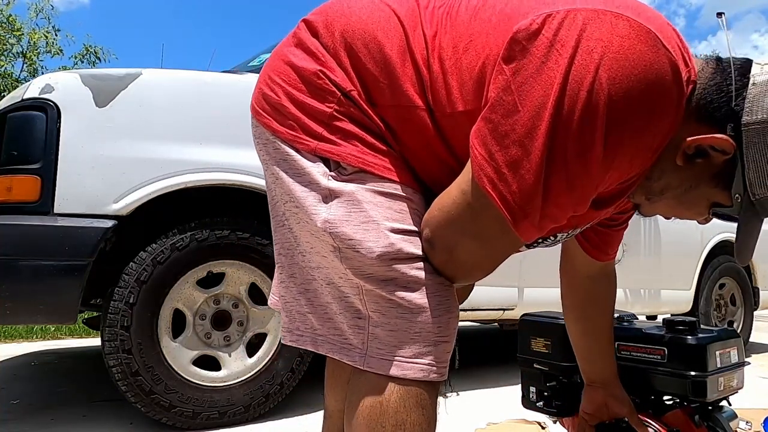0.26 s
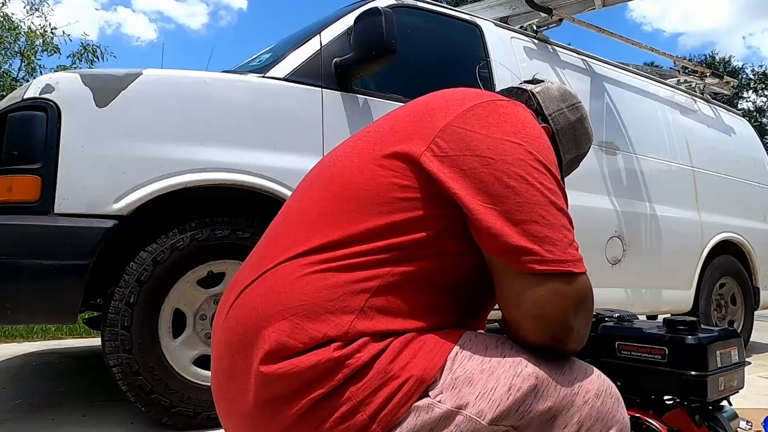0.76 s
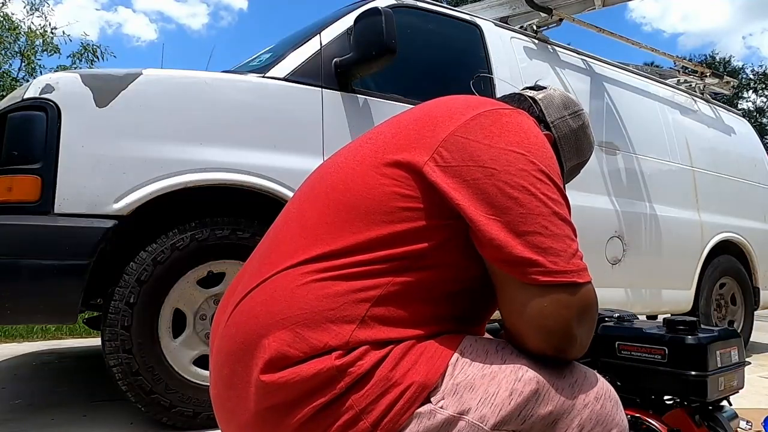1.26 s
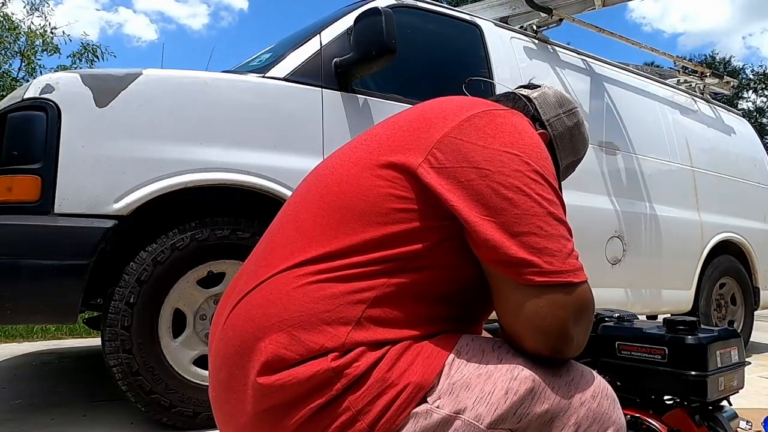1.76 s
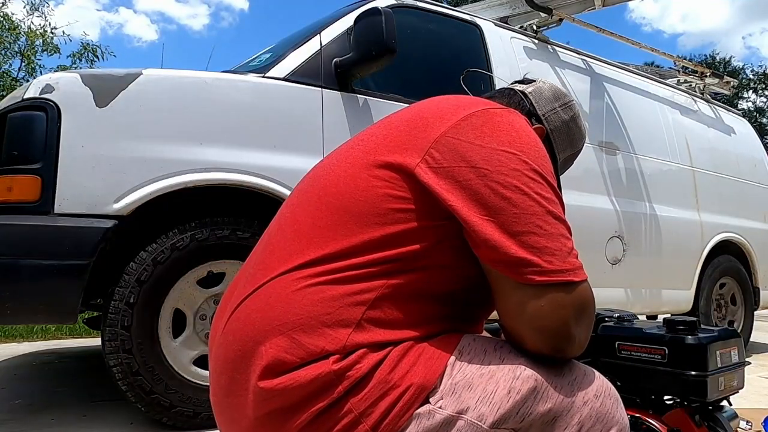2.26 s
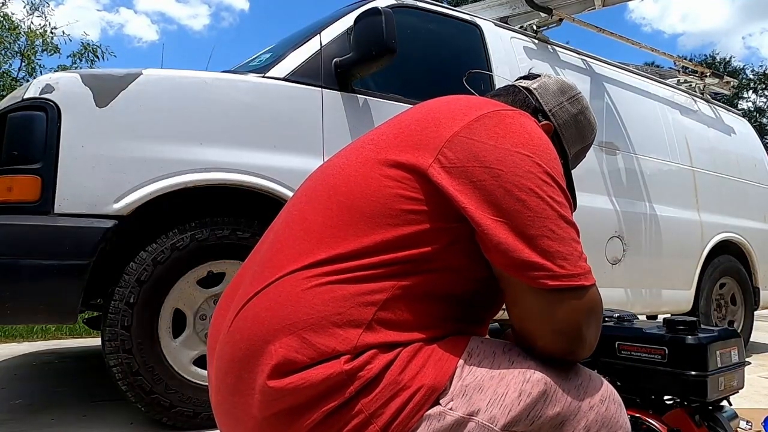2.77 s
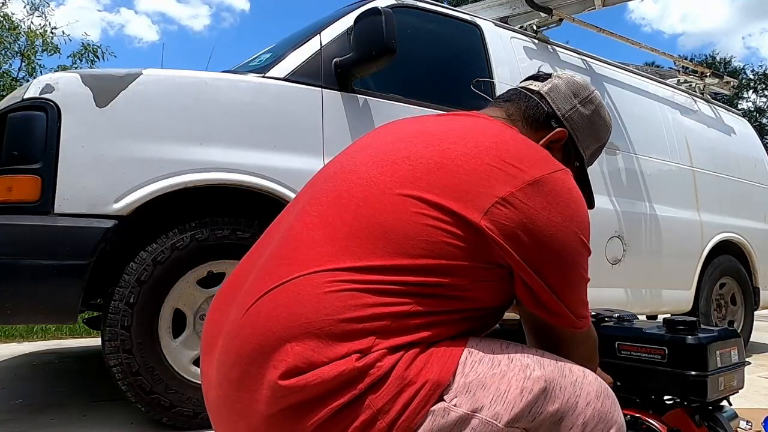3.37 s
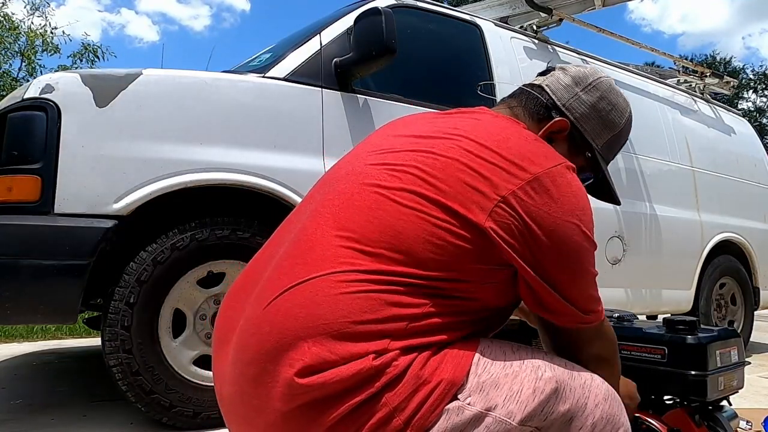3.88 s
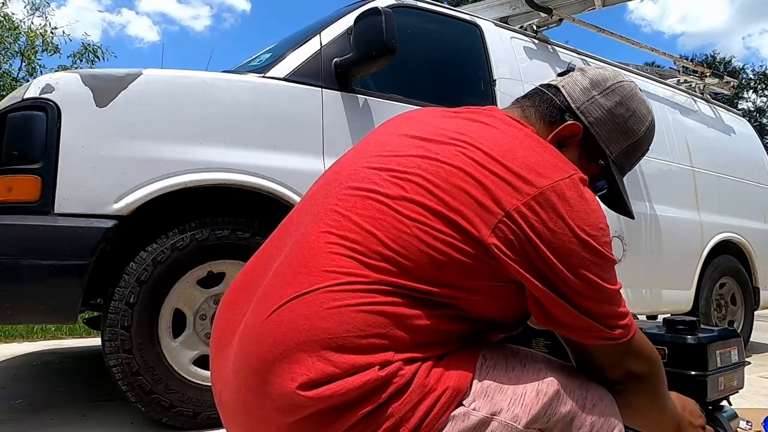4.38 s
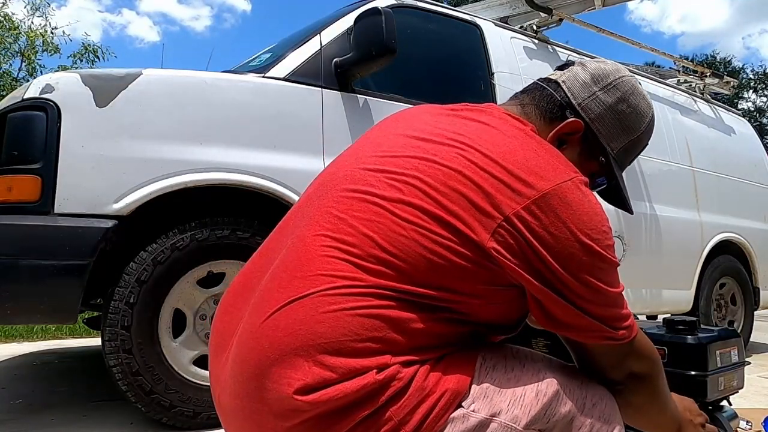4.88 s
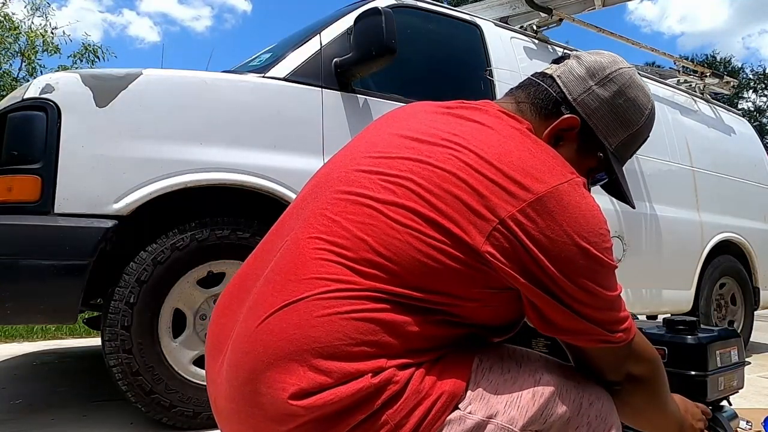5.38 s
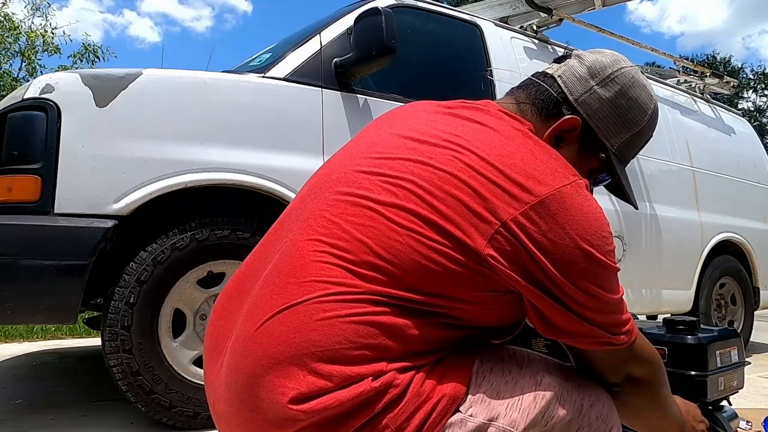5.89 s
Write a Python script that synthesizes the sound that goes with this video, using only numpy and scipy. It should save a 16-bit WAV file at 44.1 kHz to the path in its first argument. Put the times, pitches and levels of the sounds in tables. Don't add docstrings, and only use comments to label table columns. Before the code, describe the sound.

Outdoors in a driveway, a low road rumble and fan hum run throughout with faint leaves and hiss. A struck steel part rings down, then cuts away abruptly. Birds chirp and whistle. Close to the microphone, a hard metal knock is followed by a soft cloth brush, a louder rattling knock, then five spaced ratchet lever clicks with short metallic rings and slight yard reflections.

```python
import sys
import numpy as np
from scipy import signal
from scipy.fft import rfft, irfft
from scipy.io import wavfile
from scipy.ndimage import uniform_filter1d

SR = 44100
rng = np.random.default_rng(int(sys.argv[2]) if len(sys.argv) > 2 else 0)


def magnitude_from_level(level_db):
    exponent = np.asarray(level_db, float) / 20
    return 10 ** exponent


def int16_out(signal):
    q = np.round(np.clip(np.atleast_2d(signal).T, -1, 1) * 32767)
    wavfile.write(sys.argv[1], SR, q.astype(np.int16))


N = 270774

# time_s, level_db
TRAFFIC = [(0.3, -41), (1.0, -41), (1.45, -41.5), (2.1, -43.5), (2.25, -46), (2.4, -43), (2.9, -45),
           (3.2, -41.5), (3.5, -44.5), (4.1, -41.5), (4.35, -46), (4.55, -43), (6.1, -44)]
# pitch_hz, density_db
RUMBLE = [(8.8, -57), (15, -3.5), (64, 3), (146, -1), (177, -4), (206, -5.5), (241, -9), (258, -32),
          (291, -20), (382, -21.5), (900, -47), (1170, -63), (1980, -120)]
# pitch_hz, density_db
RUSTLE = [(290, -29), (500, -10.5), (742, -10), (805, -11), (1010, -10), (1050, -4.5), (1440, -6),
          (2080, -15), (2160, -15.5), (2780, -17), (5520, -17), (6060, -16), (8000, -24.5), (10400, -68),
          (17600, -120)]
# time_s, treble_lift_db
BREEZE = [
    (0, -6),
    (1.1, -3),
    (1.6, 0),
    (3.9, 1),
    (4.25, 7),
    (4.6, 2.5),
    (6.14, 7.5),
]
# pitch_hz, density_db
HISS = [(4410, -40), (7500, -12), (8650, -13.5), (10200, 0.5), (10600, 3), (11400, -17), (11700, -22),
        (11900, -41), (12700, -20), (13300, -13), (14000, -23), (14600, -38), (15500, -40)]
# pitch_hz, likeness (-1 to 1)
SIDE_LIKENESS = [(60, 0.97), (130, 1), (290, 0.87), (640, 0.65), (1410, 0.81), (3100, 0.37), (6820, 0.98),
                 (15000, -1)]
# pitch_hz, left_over_right_db
AIR_LEAN = [(60, 0), (290, -1), (640, -2), (1410, 0.5), (3100, 3.5), (6820, -2.5), (10000, 8), (15000, 17)]
# pitch_hz, width_hz, level_db
FAN_ORDERS = [(57.4, 6.5, -49.5), (117.86, 9.1, -50.5), (287, 24.5, -62.5), (346.7, 14, -69),
              (414, 3.8, -71.5)]
# pitch_hz, width_hz, level_db
HIGH_WHINES = [(10560, 150, -76), (13400, 120, -87.5)]
# pitch_hz, width_hz, level_db
RIDGES = [(991, 40, 0), (2050, 17, -9), (3720, 220, -6), (4740, 330, -12), (4950, 43, -10), (5210, 56, -12),
          (5930, 150, -9), (6930, 100, -12), (7330, 180, -16), (8660, 55, -25)]
THIRD_HZ, THIRD_DB = 178.1, -49.5
FOURTH_HZ, FOURTH_DB = 232.6, -56
TWIN_DB, TWIN_OFF_S, TWIN_FADE_S = -53, 3.78, 0.35
SLIP_START_S, SLIP_END_S, SLIP_HZ = 1.447, 2.684, 3.098

CUT_S = 0.69
# pitch_hz, level_db, t60_s, waver_width_hz
FIRST_TONES = [(610, -55, 1.7, 61), (563, -45.5, 0.97, 41), (1227, -56.5, 0.97, 21), (1396, -60, 0.71, 30),
               (856, -62, 0.75, 33), (1817, -54.5, 0.44, 40), (1780, -60.5, 3.6, 110),
               (950, -54.5, 1.1, 440)]
# level_db, t60_s
STEEL = [(-54, 1.1), (-46, 1.5), (-51.5, 1.5), (-56, 1.9), (-58.5, 2.2), (-52, 1.8), (-62, 1.4)]
STEEL_HZ = [622, 615, 609.5, 602.5, 597, 587, 555.5]
STEEL_IN_STEP_S = .025
# time_s, level_db
MOTOR = [
    (0, -41.5),
    (.3, -35),
    (.68, -44),
]
MOTOR_HZ = 79
# pitch_hz, level_db
THIN_WHINES = [(10627, -70), (13345, -82)]

# start_s, length_s, end_pitch_hz, level_db
CHIRPS = [(0.718, 0.057, 2020, -54.5), (1.061, 0.052, 1900, -58), (1.03, .04, 3150, -69),
          (1.06, .1, 3500, -70), (1.12, .09, 1780, -66), (1.298, .031, 2450, -65),
          (1.505, 0.026, 2620, -63), (2.713, 0.016, 2470, -56)]
# start_s, length_s, end_pitch_hz, level_db
FALLS = [(1.902, 0.05, 2140, -54.5), (1.964, 0.015, 2400, -61), (2.038, 0.012, 2040, -59),
         (2.246, 0.041, 2120, -54), (2.395, 0.022, 2080, -57.5), (2.612, 0.042, 2190, -52.5),
         (2.77, 0.02, 2076, -55.5), (5.045, .018, 2110, -58), (5.08, 0.031, 2110, -57.5),
         (5.327, 0.029, 1940, -62), (5.582, .021, 1970, -61)]
LIFTS = [1.869, 2.22, 4.69]
# start_s, length_s, end_pitch_hz, level_db
HELD = [
    (5.221, 0.042, 2450, -63),
    (5.479, 0.06, 2450, -60),
]
# start_s, length_s, start_pitch_hz, level_db
DROPS = [
    (3.073, 0.036, 3080, -56),
    (3.194, 0.04, 3020, -58.5),
    (3.323, 0.038, 2960, -60),
    (3.542, 0.041, 2950, -60),
    (3.972, 0.05, 3100, -61),
    (4.34, 0.04, 2680, -60.5),
]
# start_s, end_pitch_hz
GRACES = [(3.288, 3140), (3.504, 3300), (3.952, 3300), (4.299, 3050)]
COO_S, COO_LENGTH_S, COO_HZ, COO_DB = .775, .12, 1830, -61.5
LIFT_LENGTH_S, LIFT_HZ, LIFT_DB = 0.033, 2760, -64.5
GRACE_LENGTH_S, GRACE_DB = 0.023, -65.5
FALL_RATIO, HELD_RATIO, LIFT_RATIO, CHIRP_RATIO, DROP_RATIO = 1.25, 1.06, .92, 1.15, 1.3
NEAR_ROUGH, COO_ROUGH, DROP_ROUGH, FAR_ROUGH = 0.15, .55, .62, .8
GLIDE_BEND, DROP_BEND = 1.83, .42

# start_s, peak_db, chatter_t60_s, crack_over_modes_db, first_touch_over_chatter_db
KNOCKS = [
    (2.5996, -21.5, 0.053, 8.5, 10),
    (2.729, -39.5, 0.11, -2, -4),
    (3.7156, -20, 0.12, 0.5, -14),
    (3.744, -28, 0.18, 10, 1),
    (3.761, -27, 0.2, 4, -12),
    (4.721, -24.5, 0.077, -1, -13),
    (5.006, -36.5, 0.11, -1, -6),
    (5.279, -30, 0.097, 3.5, -6),
    (5.6229, -18.5, 0.065, 6.5, -12),
    (5.994, -25, 0.09, -0.5, -3),
]
# time_s, level_over_chatter_start_db
BOUNCES = [(2.6028, -15), (2.612, -10), (2.619, -12), (2.7363, 2), (3.7176, -3), (3.7204, 1), (3.723, 0),
           (3.7295, -7), (3.736, -5), (3.74, -8), (3.75, 4), (3.753, -2), (3.7588, -7), (3.767, 1),
           (3.77, 2), (3.778, -3), (3.7852, -3), (3.791, -9), (4.7239, 2.5), (4.7262, 3), (4.7286, -3),
           (4.7319, 2), (4.7388, -9), (4.7508, -12), (5.011, 8), (5.0162, -2), (5.022, -2), (5.2822, -6),
           (5.288, -7), (5.2968, -14), (5.625, 4.5), (5.6273, -4), (5.6306, 0), (5.635, -6), (5.64, -8),
           (5.644, -9), (5.648, -9), (5.656, -14), (5.664, -16), (5.9963, 3), (6.0005, -2), (6.0033, -6),
           (6.0094, -7), (6.024, -10)]
# pitch_hz, width_hz, level_db
BODIES = [
    [(1000, 140, -3), (1500, 49, 6), (1950, 66, -9), (2730, 87, -12), (4380, 200, 4), (5600, 94, -5),
     (5760, 80, -7), (6800, 90, -28), (7500, 92, -20)],
    [(1424, 38, 2), (2600, 400, -11), (4000, 42, -19), (4400, 200, -11), (6070, 71, -10), (6960, 44, -10)],
    [(1370, 90, -2), (1867, 60, 2.5), (2670, 230, -6), (3920, 160, -9), (5310, 50, -8), (6130, 42, -17),
     (6380, 32, -30), (7600, 120, -5), (8970, 100, -3), (9880, 30, -34)],
    [(1790, 87, -11), (1990, 53, 13), (2800, 240, -2), (5100, 110, -12), (6150, 110, -18), (7340, 84, 0),
     (8900, 100, -8)],
    [(1377, 43, 4.5), (2700, 200, -11), (4370, 33, -12), (5960, 35, -17), (7150, 60, -8), (8240, 67, -12),
     (8900, 51, -20)],
]
# pitch_hz, width_hz, level_db
LEVER_BODIES = [
    [(830, 100, -4.5), (1410, 31, -2), (1730, 38, -9), (2680, 110, -8), (3100, 55, -6), (3740, 72, -4),
     (5900, 42, -16), (7070, 46, -10), (7600, 32, -11)],
    [(1730, 84, -13), (3160, 40, 4), (3700, 57, 11), (5200, 25, -7), (5460, 58, -13)],
    [(850, 93, 2.5), (1270, 26, 4), (1720, 64, -14), (3140, 100, -3), (4030, 37, -12), (7730, 34, -5),
     (8700, 190, -21), (9100, 34, -17)],
    [(750, 41, 1), (1070, 25, -17), (1430, 99, -2), (1480, 15, -13), (1810, 69, 1.5), (2620, 20, 3.5),
     (3020, 110, -6), (3740, 66, 0), (6300, 41, -10)],
    [(732, 25, 2), (1273, 76, -8), (3100, 36, -9), (3390, 92, -5), (3700, 48, -3), (5600, 58, -13),
     (6360, 150, -14), (7300, 32, -13), (8800, 39, -13)],
]
# pitch_hz, density_db
CRACKS = [
    [(290, -56), (500, -59), (771, -5.5), (1480, -6), (2450, -7), (2790, -5), (3040, -18), (5040, -11.5),
     (5490, -3.5), (15800, -40)],
    [(530, -51), (900, -16), (1450, -7), (3610, -23), (4320, -12), (10900, -45), (15800, -56)],
    [(290, -61), (500, -40), (900, -14), (1830, 1), (2150, -11), (2710, -9), (5820, -16.5), (9100, -17),
     (12000, -34), (15800, -45)],
    [(290, -51), (500, -18), (1830, -3), (2240, -10), (4110, -14), (7330, -9), (15800, -39)],
    [(210, -43), (350, -13.5), (1380, -3), (2330, -14), (7330, -19), (13200, -33), (15800, -50)],
]
# pitch_hz, density_db
LEVER_CRACKS = [
    [(240, -42), (400, -10), (1750, -5), (2170, -17), (3710, -4), (4270, -13), (9930, -11), (12000, -35),
     (15800, -50)],
    [(350, -48), (600, -14), (1720, -12), (2290, -17), (3650, -14), (9760, -12), (15800, -50)],
    [(240, -39), (400, -19), (1570, -11), (1720, -4), (2380, -16), (3230, -11.5), (9780, -16), (15800, -53)],
    [(240, -52), (400, -58), (751, -7), (1830, -9), (2820, -32), (3660, -17), (9480, -22), (15800, -49)],
    [(240, -43), (400, -13), (587, -36), (751, -5), (1950, -7), (3440, -30), (4400, -22.5), (9780, -16),
     (15800, -65)],
]
# pitch_hz, level_db
TREBLE = [(3500, -40), (5500, 0)]
# start_s, pitch_hz, level_db, t60_s, cluster_width_hz
RINGS = [
    (2.6, 1500, -54, 0.6, 81),
    (2.6, 1118, -47.5, 0.45, 750),
    (3.72, 2890, -60, 0.5, 140),
    (3.772, 261.6, -34, 0.071, 3.1),
    (3.772, 190.2, -34.5, 0.18, 11),
    (4.724, 885, -44.5, 0.23, 180),
    (5.624, 830, -42.5, 0.21, 200),
    (5.01, 1730, -44.5, 0.059, 100),
]
# start_s, lower_hz, lower_db, upper_hz, upper_db
LEVER = [
    (4.724, 3180, -42, 3740, -42),
    (5.01, 3150, -52.5, 3640, -53),
    (5.283, 3330, -48, 3700, -60),
    (5.625, 3290, -49, 3637, -39.5),
    (5.997, 3406, -40, 3580, -53),
]
# lower_t60_s, upper_t60_s
LEVER_T60 = [(0.18, .14), (0.19, 0.17), (0.17, 0.14), (0.16, 0.15), (.2, .16)]
# start_s, pitch_hz, level_db, t60_s
PINGS = [(2.6, 1470, -38.5, .1), (2.6, 1970, -39.5, 0.066), (2.6, 2630, -43, .06), (2.6, 4290, -40, 0.035),
         (2.6, 4850, -44, 0.045), (2.6, 5510, -46, .06), (2.606, 1047, -41, 0.089),
         (3.718, 1780, -33, 0.11), (3.718, 1343, -35, .05), (3.722, 2700, -37, .08), (3.72, 7547, -45, .06),
         (3.718, 8900, -43, .08), (3.745, 7250, -46, .12), (3.745, 1810, -43, .12), (3.762, 1370, -36, 0.1),
         (3.775, 196, -32, .08), (4.722, 1430, -41, .08), (4.7225, 3740, -37, .1), (4.727, 3140, -45, 0.14),
         (4.73, 850, -35, .04), (4.728, 1730, -46, .1), (5.624, 1746, -34, 0.036),
         (5.624, 1886, -29, 0.048), (5.625, 1290, -33, .045), (5.626, 1047, -32, .04),
         (5.627, 765, -32.5, 0.08), (5.634, 3690, -43, 0.13), (5.625, 2605, -38, 0.058),
         (5.625, 6300, -45, .04),
         (5.0065, 1744, -48, .05), (5.011, 3133, -48, .07), (5.2795, 1760, -42, .05),
              (5.281, 1265, -43, .05), (5.283, 899, -41, .066), (5.282, 3219, -43, .03),
              (5.9942, 1450, -30, .025), (5.9942, 1750, -33, .025), (5.6245, 1500, -28, .04),
              (2.6, 2250, -40, .07), (3.7195, 1900, -33, .07), (5.9955, 1270, -40, .07),
              (5.997, 732, -37, .07), (6.002, 3112, -43, .055), (5.997, 3731, -43, .07),
              (6.004, 3402, -46, .1), (4.7213, 1350, -38, .025), (4.76, 950, -48, .08),
              (5.644, 900, -42, .06), (5.654, 1850, -47, .05), (3.724, 2950, -40, .06),
              (3.726, 2050, -38, .08), (3.765, 1750, -42, .06), (3.774, 8200, -54, .03)]
# pitch_hz, left_lift_db
HANDS_LEAN = [(130, 8.5), (640, -1.5), (1410, 1.5), (3100, 1.5), (5000, 0.5), (6820, -5), (10000, 1.5),
              (15000, -2)]
# pitch_hz, density_db
CLOTH = [(900, -12), (2000, -12), (3800, -1.5), (7000, -8), (11000, -21), (15000, -35)]
HANDS_PAN_DB = -2.5
TOUCH_RISE_S, BOUNCE_T60_S, PING_RISE_S = 0.0011, 0.0088, .001
TREBLE_FLASH_DB, TREBLE_T60_S, TREBLE_LOSS = -5, 0.04, 0.3
RING_CLEAR = .4
PAIR_WIDTH_HZ = 150
FRAME_HZ, FRAME_DB, FRAME_T60_S, FRAME_WIDTH_HZ = 456.2, -12.5, 0.28, 14
BRUSH_S, BRUSH_LENGTH_S, BRUSH_DB, BRUSH_EDGE_DB = 2.95, 0.24, -54.5, -14.5

# pitch_hz, phase_rad
PORT_LAG = [(100, 0.013), (1000, -0.39), (2800, -0.81), (4500, -1.19), (7600, -1.42), (12000, -1.76)]


def evened(x):
    return x / np.sqrt(np.mean(x ** 2) + 1e-20)


def read(points, hz):
    f, value = np.transpose(points)
    return np.interp(np.log(hz + 1), np.log(f + 1), value)


def add(mix, s, sound, pan_db):
    part = mix[:, round(s * SR):][:, :len(sound)]
    part += magnitude_from_level([[pan_db / 2], [-pan_db / 2]]) * sound[:part.shape[1]]


def coloured(x, points):
    gain = magnitude_from_level(read(points, np.fft.rfftfreq(len(x), 1 / SR)))
    return irfft(rfft(x) * gain, len(x))


def resonate(x, hz, width):
    turn = np.exp(2j * np.pi * np.cumsum(hz * np.ones(len(x))) / SR)
    r = np.exp(-np.pi * width / SR)
    return 2 * (turn * signal.lfilter([1 - r], [1, -r], x / turn)).real


def fuzzy(hz, width, count):
    once = resonate(rng.standard_normal(count + 8192), hz, width)
    return evened(resonate(once, hz, 2 * width)[8192:])


def tone(curve, hz, drift_hz):
    t = np.arange(N) / SR
    drift = drift_hz * evened(uniform_filter1d(rng.standard_normal(N), 2000))
    level = magnitude_from_level(np.interp(t, *np.transpose(curve)))
    return level * np.sqrt(2) * np.sin(2 * np.pi * np.cumsum(hz + drift) / SR)


def noise_bed(points, patchy_db, treble_db=0):
    hz = np.fft.rfftfreq(2048, 1 / SR)
    a, b, c, d, patches = rng.standard_normal((N // 512 + 5, 1025, 5)).T
    patches = evened(uniform_filter1d(uniform_filter1d(patches, 12, 0), 8, 1))
    same = read(SIDE_LIKENESS, hz)[:, None]
    lean = magnitude_from_level(read(AIR_LEAN, hz) / 2)[:, None]
    left = a + 1j * b
    right = same * left + np.sqrt(1 - same ** 2) * (c + 1j * d)
    z = np.array([left * lean, right / lean])
    ripple_db = 1.6 * evened(uniform_filter1d(rng.standard_normal(1025), size=3))
    top = np.clip((hz - 5500) / 2000, 0, 1)[:, None]
    z *= magnitude_from_level((read(points, hz) + ripple_db)[:, None] + patchy_db * patches + top * treble_db)
    return evened(signal.istft(z, nperseg=2048, noverlap=1536)[1][:, :N])


def background():
    t = np.arange(N) / SR
    waves = [np.sin(2 * np.pi * (f * t + rng.random())) / np.sqrt(f) for f in np.geomspace(.3, 3, num=12)]
    traffic_db = np.interp(t, *np.transpose(TRAFFIC)) + 1.2 * evened(sum(waves)) - 0.28
    rumble = magnitude_from_level(traffic_db) * noise_bed(RUMBLE, patchy_db=0.5)
    frame_s = np.arange(N // 512 + 5) * 512 / SR
    breeze_db = np.interp(frame_s, *np.transpose(BREEZE))
    rustle = magnitude_from_level(-59.5) * noise_bed(RUSTLE, patchy_db=.7, treble_db=breeze_db)
    return rumble + rustle + magnitude_from_level(-71) * noise_bed(HISS, patchy_db=0.5)


def fans():
    t = np.arange(N) / SR
    slip = SLIP_HZ * np.clip((t - SLIP_START_S) / (SLIP_END_S - SLIP_START_S), 0, 1)
    twin = magnitude_from_level(TWIN_DB) * (t > CUT_S) * np.clip(1 - (t - TWIN_OFF_S) / TWIN_FADE_S, 0, 1)
    both = magnitude_from_level(THIRD_DB) + twin * np.exp(-2j * np.pi * np.cumsum(slip) / SR)
    third = np.sqrt(2) * (both * np.exp(2j * np.pi * THIRD_HZ * t)).imag
    return third + tone([(0, FOURTH_DB)], FOURTH_HZ, drift_hz=0.81)


def hum():
    orders = sum(magnitude_from_level(db) * fuzzy(hz, w, count=N) for hz, w, db in FAN_ORDERS + HIGH_WHINES)
    ridges = sum(magnitude_from_level(db - 71.5) * fuzzy(hz, max(w, 30), count=N) for hz, w, db in RIDGES)
    return fans() + orders + ridges


def first_moment():
    t = np.arange(SR) / SR
    sound = tone(MOTOR, MOTOR_HZ, drift_hz=0.38)[:SR]
    for hz, db, t60, width in FIRST_TONES:
        sound += magnitude_from_level(db - 60 * t / t60) * fuzzy(hz, width, count=SR)
    for hz, (db, t60) in zip(STEEL_HZ, STEEL):
        sound += magnitude_from_level(db + 1.5 - 60 * t / t60) * np.cos(2 * np.pi * hz * (t - STEEL_IN_STEP_S))
    for hz, db in THIN_WHINES:
        sound += tone([(0, db)], hz, drift_hz=2.5)[:SR]
    return np.pad(sound * np.clip((CUT_S - t) / 0.011, 0, 1), (0, N - SR))


def bird():
    out = np.zeros((2, N))
    notes = [(*n, CHIRP_RATIO, FAR_ROUGH) for n in CHIRPS]
    notes += [(COO_S, COO_LENGTH_S, COO_HZ, COO_DB, 1, COO_ROUGH)]
    notes += [(*n, FALL_RATIO, NEAR_ROUGH) for n in FALLS]
    notes += [(s, LIFT_LENGTH_S, LIFT_HZ, LIFT_DB, LIFT_RATIO, NEAR_ROUGH) for s in LIFTS]
    notes += [(s, GRACE_LENGTH_S, hz, GRACE_DB, CHIRP_RATIO, FAR_ROUGH) for s, hz in GRACES]
    notes += [(*n, HELD_RATIO, NEAR_ROUGH) for n in HELD]
    notes = [(*n, GLIDE_BEND) for n in notes]
    notes += [(s, d, hz / DROP_RATIO, db, DROP_RATIO, DROP_ROUGH, DROP_BEND) for s, d, hz, db in DROPS]
    for s, length, end_hz, db, ratio, rough, bend in notes:
        u = np.arange(round(length * SR)) / (length * SR)
        hz = end_hz * (1 + (ratio - 1) * (1 - u) ** bend)
        clear = np.sqrt(2) * np.sin(2 * np.pi * np.cumsum(hz) / SR)
        smear = evened(resonate(resonate(rng.standard_normal(len(u)), hz, 330), hz, 330))
        note = (1 - rough) * clear + rough * smear
        add(out, s, magnitude_from_level(db) * note * np.sin(np.pi * u) ** 0.13, -.6)
    return out


def yard(x, t60, first_s):
    taps = np.zeros((2, SR // 2))
    at = np.arange(round(first_s * SR), SR // 2 - 20, 20)
    at = at + rng.integers(0, 20, (2, len(at)))
    np.put_along_axis(taps, at, rng.choice([-1., 1.], at.shape) * magnitude_from_level(-60 * at / SR / t60), 1)
    taps = signal.lfilter([1], [1, -.6], taps)
    return signal.fftconvolve(x.mean(0)[None], taps / np.linalg.norm(taps[0]), axes=1)[:, :N]


def knock(bounces, t60, crack_db, strike_db, body, crack):
    t = np.arange(SR // 4) / SR
    force = magnitude_from_level(-60 * t / t60) * (1 - np.exp(-t / TOUCH_RISE_S))
    force += magnitude_from_level(strike_db - 60 * t / 0.014)
    for s, db in bounces:
        force += (t > s) * magnitude_from_level(db - 60 * abs(t - s) / BOUNCE_T60_S)
    spiky = rng.standard_normal(len(t)) * magnitude_from_level(1.54 * rng.exponential(1, len(t)))
    lines = rfft(force * spiky)
    chatter = irfft(lines / uniform_filter1d(abs(lines), size=70), len(t))
    gate = (1 - np.exp(-t / .0003)) * np.clip((.2 - t) / .05, 0, 1)
    modes = sum(magnitude_from_level(db) * resonate(gate * chatter, hz, max(w, 30 + hz / 70)) for hz, w, db in body)
    modes = signal.sosfilt(signal.butter(3, 9500, fs=SR, output="sos"), modes)
    sound = gate * (evened(modes) + magnitude_from_level(crack_db) * evened(coloured(chatter, crack)))
    treble_gain = magnitude_from_level(TREBLE_FLASH_DB - 60 * t / TREBLE_T60_S) - TREBLE_LOSS
    sound = sound + gate * coloured(sound, TREBLE) * treble_gain
    return sound / np.sqrt(uniform_filter1d(sound ** 2, 200).max() * 6)


def contacts():
    out = np.zeros((2, N))
    for (s, db, t60, crack_db, strike_db), body, crack in zip(KNOCKS, BODIES + LEVER_BODIES,
                                                              CRACKS + LEVER_CRACKS):
        later = min([k[0] for k in KNOCKS if k[0] > s] + [s + .1])
        bounces = [(b - s, lift_db) for b, lift_db in BOUNCES if s < b < later]
        add(out, s, magnitude_from_level(db) * knock(bounces, t60, crack_db, strike_db, body, crack), HANDS_PAN_DB)
    return out


def ringing():
    out, t = np.zeros((2, N)), np.arange(SR // 2) / SR
    rings = list(RINGS)
    for (s, low_hz, low_db, up_hz, up_db), (low_t60, up_t60) in zip(LEVER, LEVER_T60):
        rings.append((s, low_hz, low_db, low_t60, PAIR_WIDTH_HZ))
        rings.append((s, up_hz, up_db, up_t60, PAIR_WIDTH_HZ))
        rings.append((s, FRAME_HZ, max(low_db, up_db) + FRAME_DB, FRAME_T60_S, FRAME_WIDTH_HZ))
    for s, hz, db, t60, width in rings:
        clear = np.sqrt(2) * np.sin(2 * np.pi * hz * t)
        cluster = fuzzy(hz, width, count=len(t)) + RING_CLEAR * clear
        add(out, s, magnitude_from_level(db - 60 * t / t60) * cluster * (1 - np.exp(-t / 0.004)), -2.)
    for s, hz, db, t60 in PINGS:
        clear = np.sqrt(2) * np.sin(2 * np.pi * hz * t)
        add(out, s, magnitude_from_level(db - 60 * t / t60) * clear * (1 - np.exp(-t / PING_RISE_S)), HANDS_PAN_DB)
    return out


def brush():
    out = np.zeros((2, N))
    u = np.linspace(-1, 1, round(BRUSH_LENGTH_S * SR))
    cloth = evened(coloured(rng.standard_normal(len(u)), CLOTH)) * signal.windows.tukey(len(u), .3)
    add(out, BRUSH_S, magnitude_from_level(BRUSH_DB + BRUSH_EDGE_DB * u ** 2) * cloth, -.4)
    return out


def controls():
    metal = contacts() + ringing()
    return np.array([coloured(metal[0], HANDS_LEAN), metal[1]]) + brush()


def scene():
    air = background() + (hum() + first_moment()) * magnitude_from_level([[-.3], [.3]])
    song, hands = bird(), controls()
    far = song + magnitude_from_level(-9.5) * yard(song, t60=0.43, first_s=0.013)
    near = hands + magnitude_from_level(-14.5) * yard(hands, t60=0.2, first_s=.004)
    return air + far + near


def roll_off(x):
    return signal.sosfilt(signal.butter(12, 15900, fs=SR, output="sos"), x)


def record(dry):
    lag = np.exp(1j * read(PORT_LAG, np.fft.rfftfreq(N, 1 / SR)))
    ports = np.array([irfft(rfft(dry[0]) * lag, N), dry[1]])
    ports = signal.sosfilt(signal.butter(6, 16400, fs=SR, output="sos"), ports)
    return roll_off(ports)


dry = scene()
out = record(dry)
int16_out(out)
```